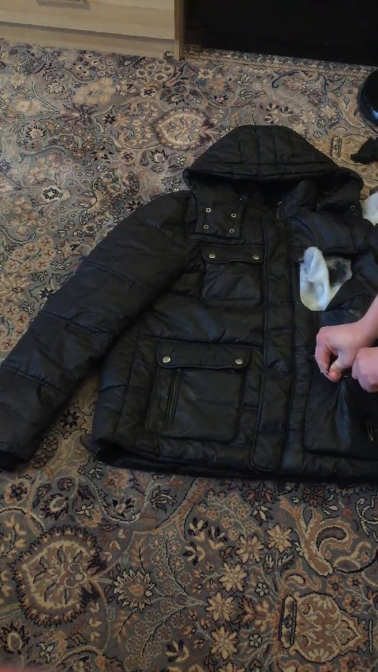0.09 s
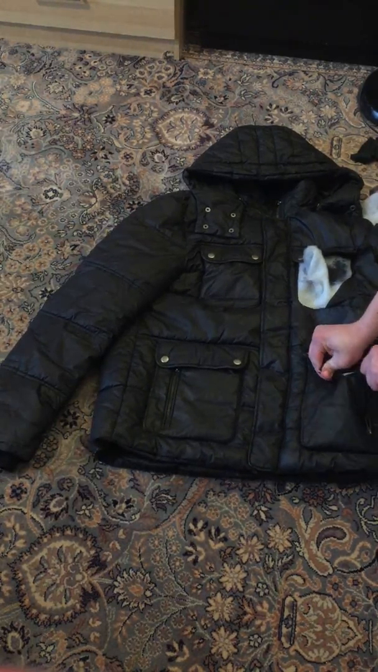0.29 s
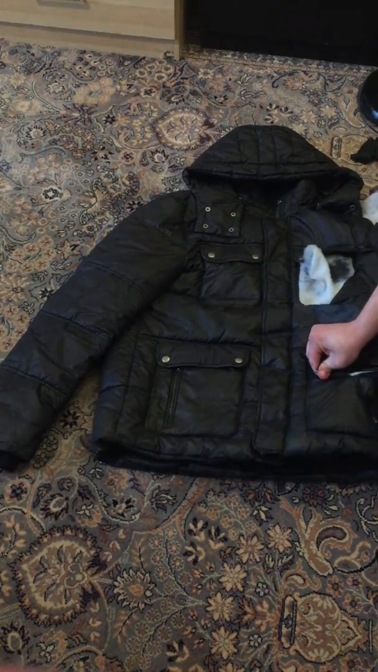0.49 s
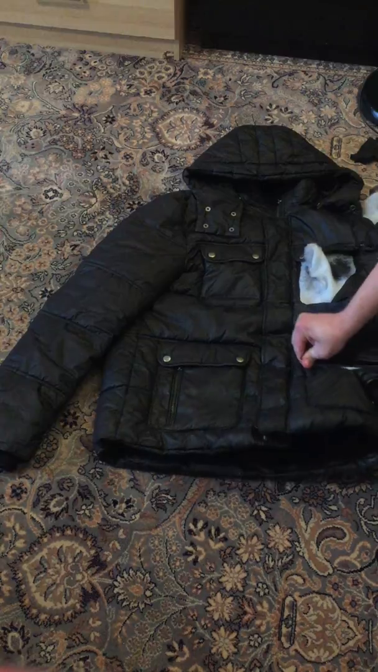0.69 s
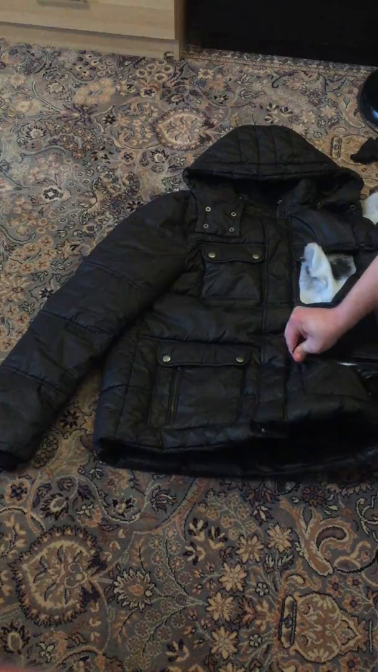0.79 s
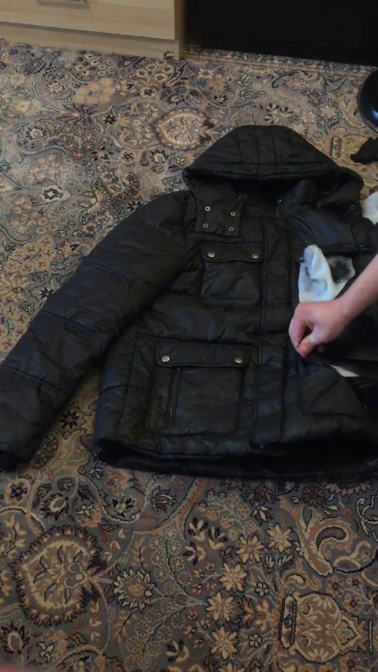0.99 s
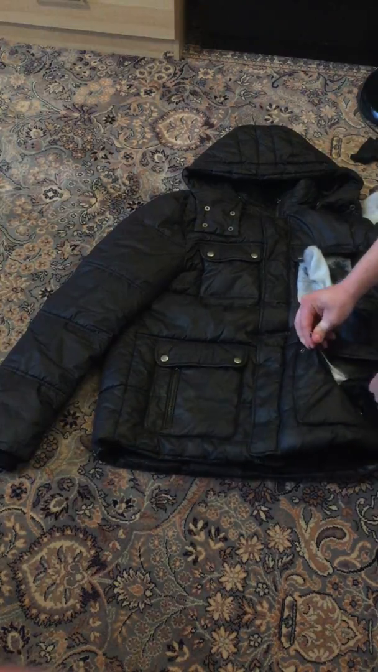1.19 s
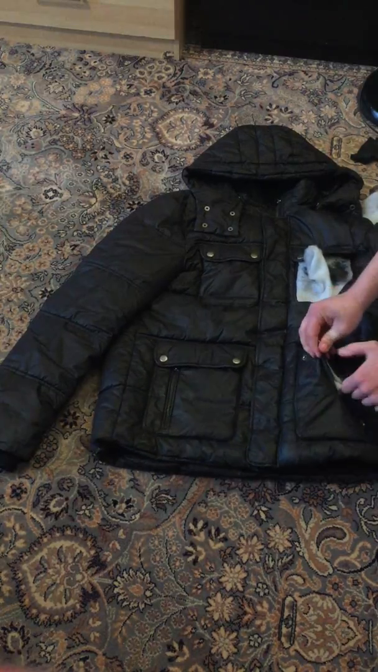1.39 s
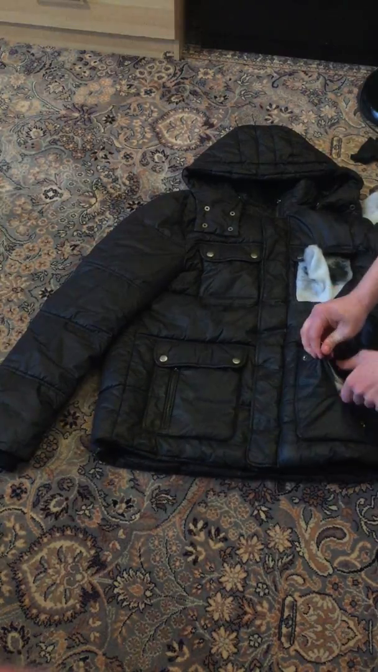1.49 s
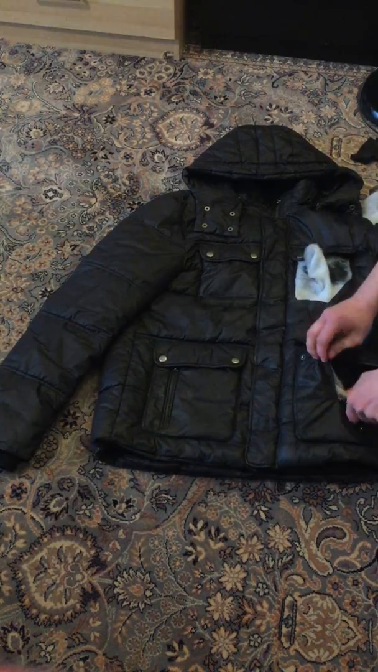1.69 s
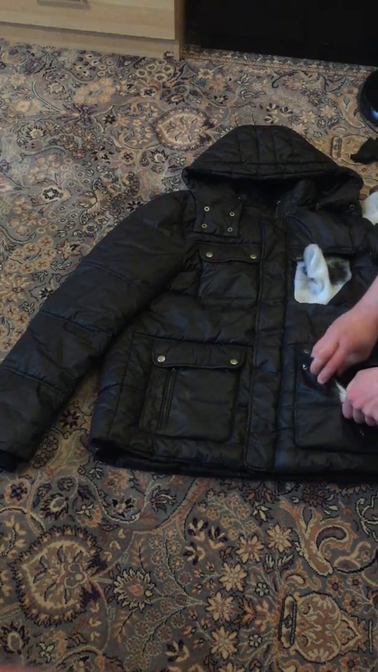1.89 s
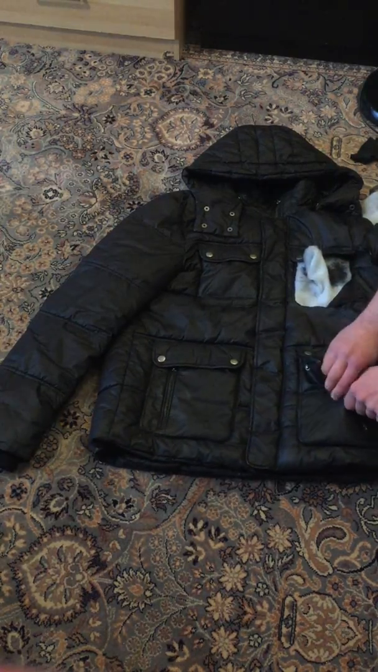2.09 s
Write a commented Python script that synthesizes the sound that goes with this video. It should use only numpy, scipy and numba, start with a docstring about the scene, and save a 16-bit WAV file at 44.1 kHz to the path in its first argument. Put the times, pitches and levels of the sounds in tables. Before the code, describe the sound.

Hands rip open a jacket's glossy synthetic shell in crackling tears, then soft rustling in a quiet room

```python
"""In a small quiet carpeted room, in mono, hands rip open the glossy synthetic shell of a jacket. Single
threads snap as the cloth tightens, then give way in short rips and three long tears: each break is a click with
a brief shiver, ringing in the thread, the taut cloth and the loosened panel, which drums loudest late in the
tearing. After the last threads go, shaped friction grains give a soft rustle under the hands, while faint noise
of the shifting padding runs beneath the whole scene from the start. Steady filtered noise is the air of the
room."""
import sys
import numpy as np
from scipy import signal
from scipy.fft import rfft, irfft
from scipy.io import wavfile
from scipy.ndimage import uniform_filter1d
from numba import njit

SR = 44100
rng = np.random.default_rng(int(sys.argv[2]) if len(sys.argv) > 2 else 0)


def put_to_file(sound):
    """Save the sound as 16-bit audio at rate SR, in the file named by the first command-line argument."""
    columns = np.atleast_2d(sound).T  # one column per channel
    safe = np.clip(columns, -1, 1)
    whole_steps = np.round(safe * 32767)
    wavfile.write(sys.argv[1], SR, whole_steps.astype(np.int16))


N = 92610  # samples, 2.1 s

# how the breaks shake the taut cloth and the loose panel
# [time_s, cloth_drive_db, cloth_ring_hz, panel_drive_db]
SHAKE = [(0, -10, 1900, -23.5), (.14, -14, 1940, -29), (.17, -14, 1630, -18), (.2, -13, 1970, -32),
         (.23, -8.5, 2140, -21.5), (.30, -13.5, 1840, -26), (.38, -4.5, 1700, -20),
         (.44, -6.5, 1670, -22.5), (.51, -14, 1410, -23.5), (.62, -8.5, 1550, -23),
         (.68, -12.5, 1550, -18.5), (.75, -4.5, 1500, -14.5), (.79, -8.5, 1570, -12.5),
         (.83, -11.5, 1550, -15.5), (.90, -15.5, 1620, -16), (.94, -3.5, 1920, -28)]
FRAY_S, FRAY_DB = 0.00055, -3  # decay time of a thread's shiver, its energy against the sharp release


def undb(db):
    """Amplitude factor from dB."""
    return 10 ** (np.asarray(db) / 20)


def unit(x):
    """The signal scaled to an RMS of 1."""
    return x / np.sqrt(np.mean(x ** 2))


def glide(rows, axis=1):
    """Straight lines over time through one column of a table."""
    rows = np.array(rows)
    return np.interp(np.arange(N) / SR, rows[:, 0], rows[:, axis])


def curve(rows, axis=1):
    """Gain over time from a column of dB."""
    return undb(glide(rows, axis))


def ring(x, response):
    """Lets every sample of x set off the response."""
    return signal.fftconvolve(x, response)[:N]


def colour(x, points, size=4096):
    """Causal minimum-phase filter of unit energy through (Hz, dB) points."""
    hz, db = np.array(points).T
    f = np.maximum(np.fft.rfftfreq(size, 1 / SR), 1)
    level_db = np.interp(np.log(f), np.log(hz), db)
    cepstrum = irfft(np.log(undb(level_db)))
    # folding the cepstrum forward puts the energy as early as it can be
    cepstrum[1:size // 2] *= 2
    cepstrum[size // 2 + 1:] = 0
    response = irfft(np.exp(rfft(cepstrum)))
    return ring(x, response / np.linalg.norm(response))


def resonance(x, hz, width_hz):
    """One fixed resonance, gain 1 at its peak."""
    b, a = signal.iirpeak(hz, hz / width_hz, fs=SR)
    return signal.lfilter(b, a, x)


@njit
def gliding(x, hz, width_hz):
    """Band-pass with a moving centre, gain 1 there."""
    y = np.empty(len(x))
    band, low = 0., 0.  # the two states of the filter
    for i in range(len(x)):
        g = np.tan(np.pi * hz[i] / SR)
        damping = np.tan(np.pi * width_hz / SR) * (1 + g * g) / g
        v = (band + g * (x[i] - low)) / (1 + g * (g + damping))
        band = 2 * v - band
        low = low + 2 * g * v
        y[i] = damping * v
    return y


def below(x, hz):
    """Zero-phase low-pass."""
    return signal.sosfiltfilt(signal.butter(2, hz, fs=SR, output="sos"), x)


def clicks(per_s, scatter_db, jitter, size=400):
    """Unevenly spaced clicks of scattered size, with an even power over some ten milliseconds."""
    gap, strength, side = rng.standard_normal((N // 2, 3)).T
    gap = np.exp(jitter * gap)
    at = (np.cumsum(gap / gap.mean()) * SR / per_s).astype(int)
    height = undb(scatter_db * strength) * np.sign(side)
    inside = at < N
    train = np.bincount(at[inside], height[inside], N)
    power = np.abs(uniform_filter1d(train ** 2, size))
    return train / np.sqrt(power + 1e-9)


def crack(fray_s, fray_db, size=512):
    """One break: a sharp release and a brief random shiver of the fibres, unit energy in all."""
    t = np.arange(size) / SR
    fray = rng.standard_normal(size) * np.exp(-t / fray_s) * (t > 0)
    pulse = (t == 0) + undb(fray_db) * fray / np.linalg.norm(fray)
    return pulse / np.linalg.norm(pulse)


def crackle(breaks, fray_s, fray_db, count=12):
    """Gives every break one of a dozen different shivers."""
    kind = rng.integers(0, count, N)
    return sum(ring(breaks * (kind == k), crack(fray_s, fray_db)) for k in range(count))


def surges(per_s=110, depth_db=1.4):
    """The tear catches and lets go many times a second: a random wander in level."""
    hold = int(SR / per_s / 2)  # samples, two steps to a surge
    steps = np.repeat(rng.standard_normal(N // hold + 1), hold)
    walk = uniform_filter1d(steps, hold // 2)[:N]
    swing = unit(walk - uniform_filter1d(walk, 4 * hold))  # without the slow drift
    return unit(undb(depth_db * swing))


def ripping():
    """The tear runs through the weave, thread after thread, in short rips and long pulls."""
    # short rips, a few threads in a row [start_s, length_s, level_db]
    rips = [(0, 0.054, -50.5), (0.225, 0.0075, -30), (0.2647, 0.0055, -28.5), (0.277, .006, -33),
            (0.2867, 0.0079, -30), (0.3088, 0.0016, -27.5), (0.3146, 0.013, -33.5), (.331, 0.0054, -29),
            (0.344, .009, -31), (0.357, .011, -31), (0.388, 0.004, -31), (0.396, 0.018, -37.5),
            (0.411, 0.0098, -34), (0.421, 0.0023, -36), (0.4353, 0.0016, -21.5), (0.437, 0.015, -36),
            (0.545, 0.009, -69), (.5728, 0.0066, -34), (0.6162, 0.011, -33), (0.6515, 0.004, -28),
            (0.7344, 0.01, -35), (0.7717, 0.0023, -25), (0.781, 0.0056, -35)]
    # long tears, one curve each [time_s, level_db]
    tears = [
        [(.453, -32), (.468, -28.5), (.50, -26.5), (.53, -28.5), (.55, -31), (.57, -37.5), (.612, -46)],
        [(.656, -32), (.668, -30.5), (.69, -32), (.71, -30.5), (.725, -38.5), (.75, -38), (.77, -51)],
        [(.778, -35.5), (.80, -29.5), (.83, -29.5), (.855, -31), (.875, -37), (.90, -34), (.915, -34.5),
         (.942, -40)],
    ]
    threads_per_s = 1350
    t = np.arange(N) / SR
    train = clicks(threads_per_s, scatter_db=3.6, jitter=0.55)
    pull = np.zeros(N)
    for rows in tears:
        pull = pull + curve(rows) * (t >= rows[0][0]) * (t < rows[-1][0])
    breaks = train * surges() * pull
    for start, length, db in rips:
        # fades over the half length centred on the end
        gate = np.clip((start + length - t) / (length / 2) + 0.5, 0, 1) * (t >= start)
        burst = train * gate
        burst[np.argmax(gate)] += np.sqrt(SR / threads_per_s)  # the thread that sets it off
        breaks = breaks + undb(db) * burst * np.linalg.norm(gate) / np.linalg.norm(burst)
    return breaks


def snaps():
    """Strong threads part one at a time: the jolts they give the cloth, and their own brief rings."""
    # single strong threads [start_s, level_db, ring_hz]
    strong_threads = [(.0039, -20.5, 6000), (0.0258, -24.5, 6000), (0.0274, -19, 6000), (0.051, -21, 9500),
                      (0.0572, -19.5, 9000), (0.1136, -27, 9500), (0.123, -19.5, 9500), (.1445, -23, 5500),
                      (.17, -13, 5570), (0.2013, -11, 9500), (0.219, -21, 9000), (0.2798, -12.5, 9000),
                      (0.3033, -11, 9000), (0.3125, -10, 8500), (0.3616, -12.5, 9000), (0.6384, -12, 8000),
                      (0.6728, -20, 8000), (0.6968, -11, 10000), (0.8186, -13, 12000),
                      (0.8406, -11.5, 8500), (.864, -9, 7500), (0.8804, -6, 7500), (0.8861, -7.5, 7000),
                      (0.8929, -6, 7500), (.8989, -6, 7000), (0.9081, -5, 5360), (0.9337, -14.5, 5500)]
    ring_db, ring_width_hz = -1, 2700
    jolts, rings = np.zeros(N), np.zeros(N)
    for start, db, hz in strong_threads:
        pulse = crack(FRAY_S, FRAY_DB)
        pulse = pulse + undb(ring_db) * resonance(pulse, hz, ring_width_hz)
        i = max(int(start * SR), 0)
        jolts[i] += undb(db)
        rings[i:i + len(pulse)] += undb(db) * pulse / np.linalg.norm(pulse)
    return jolts, rings


def threads(cracks):
    """The bright crackle of the threads themselves; its ring moves with their tension."""
    # tone of a parting thread [frequency_hz, level_db]
    thread_tone = [(100, -44.5), (500, -32), (900, -28.5), (1500, -14), (2500, -1), (3100, -1.5), (4000, 0),
                   (4700, -2), (5300, -2), (6500, -2), (7500, -3), (9200, -0.5), (10200, -4), (11500, 0.5),
                   (14000, -3.5), (17000, -3)]
    # tension of the threads [time_s, ring_hz, ring_db, top_treble_db]
    tension = [(0, 8800, -4, 7), (.2, 9100, -0.5, 6), (.3, 9300, 0, -4.5), (.46, 7700, 7, 0),
               (.495, 11400, 2, -1), (.525, 4530, -3.5, 0), (.62, 6500, -1, -1.5), (.68, 7860, -12, 1),
               (.75, 11700, -11, 3.5), (.82, 12200, 3.5, -0.5), (.87, 8200, -7, 2), (.92, 4000, -22, -3)]
    ring_width_hz, treble_hz = 4800.0, 12900
    sound = colour(cracks, thread_tone)
    share = curve(tension, axis=2)
    ringing = gliding(sound, glide(tension), ring_width_hz)
    sound = (sound + share * ringing) / np.sqrt(1 + share)
    dull = below(sound, treble_hz)
    return dull + (sound - dull) * curve(tension, axis=3)


def cloth(breaks, order=3):
    """The taut cloth rasps in one broad, steep-sided resonance that glides as the tear goes on."""
    width_hz = 1840.0  # of each pass
    sound = crackle(breaks * curve(SHAKE, axis=1), fray_s=0.001, fray_db=6.5)
    for _ in range(order):
        sound = gliding(sound, glide(SHAKE, axis=2), width_hz)
    return sound * np.sqrt(SR / (width_hz * 3 * np.pi / 8))  # makes up for the narrow band


def panel(breaks):
    """The loose panel drums: the breaks shake it into short shivers of low and middle pitch."""
    # tone of the panel [frequency_hz, level_db]
    panel_tone = [(30, -48), (70, -29), (120, -12), (175, -10.5), (240, 2), (300, 1), (360, 6), (440, -3.5),
                  (620, 0.5), (740, -5.5), (900, -4.5), (1100, -13.5), (1300, -12), (3000, -46)]
    shivers = crackle(breaks * curve(SHAKE, axis=3), fray_s=0.0013, fray_db=2.5)
    return colour(shivers, panel_tone)


def shell(sound):
    """The stretched shell adds narrow resonances to all that sounds in it."""
    # resonances of the stretched shell [centre_hz, width_hz, gain_db]
    shell_modes = [(1370, 20.2, -15), (1550, 17, -14.5), (3030, 77, -3), (5180, 160, 0)]
    return sound + sum(undb(db) * resonance(sound, hz, width_hz) for hz, width_hz, db in shell_modes)


def jacket():
    """Each break sounds from the thread itself, the taut cloth around it and the loose panel."""
    rips = ripping()
    jolts, rings = snaps()
    breaks = rips + jolts
    cracks = crackle(rips, FRAY_S, FRAY_DB) + rings
    return shell(threads(cracks) + cloth(breaks) + panel(breaks))


def rustle():
    """Fine friction grains as the hands slide over the shell, and noise as the padding shifts."""
    # the padding shifting [time_s, level_db]
    padding = [(1, -73), (1.15, -66.5), (1.3, -73), (1.4, -74), (1.56, -75.5), (1.65, -72.5), (1.88, -70.5),
               (2.1, -73.5)]
    # tone of the padding [frequency_hz, level_db]
    padding_tone = [(100, -9), (350, 6), (800, 2), (1600, 0), (2300, 2), (3000, -4), (6000, -16),
                    (16000, -13)]
    # strokes of the hands over the cloth [centre_s, spread_s, level_db, ring_hz]
    strokes = [(1.025, 0.022, -62.5, 11500), (1.129, .028, -66, 12000), (1.193, 0.044, -81, 2000),
               (1.272, .04, -72.5, 2200), (1.485, 0.019, -66.5, 4740), (1.536, 0.022, -71.5, 5000),
               (1.606, 0.013, -70, 9000), (1.652, 0.044, -70.5, 8040), (1.734, 0.039, -69.5, 9000),
               (1.882, 0.067, -71, 2300)]
    # tone of the friction grains [frequency_hz, level_db]
    grain_tone = [(300, -5), (800, -15), (1600, 3), (3000, -2.5), (5000, -4.5), (9000, -7.5), (10300, -9.5),
                  (12000, -3.5), (17000, -10.5)]
    ring_db, ring_q = -3, 2.7
    t = np.arange(N) / SR
    grains = colour(clicks(per_s=5100, scatter_db=3.5, jitter=1.0), grain_tone)
    out = colour(curve(padding) * rng.standard_normal(N), padding_tone)
    for at, spread, db, hz in strokes:
        swish = unit(grains + undb(ring_db) * resonance(grains, hz, hz / ring_q))
        swell = np.exp(-((t - at) / spread) ** 2 / 2)
        out = out + undb(db) * swell * swish
    return out


def room(x):
    """A small carpeted room: a short diffuse tail, weaker and briefer in the treble."""
    tail_db, delay_s, t60_s = -4, 0.003, 0.25
    split_hz, treble_db, treble_t60_s = 8100, -6, 0.16
    t = np.arange(SR // 2) / SR
    noise = rng.standard_normal(len(t)) * (t > delay_s)
    low = below(noise, split_hz)
    fade = np.exp(-np.log(1000) * t / t60_s)
    treble_fade = np.exp(-np.log(1000) * t / treble_t60_s)
    tail = low * fade + undb(treble_db) * (noise - low) * treble_fade
    return x + undb(tail_db) * ring(x, tail / np.linalg.norm(noise * fade))


def air():
    """The quiet of the room: steady noise, strongest in the bass."""
    # tone of the room air [frequency_hz, level_db]
    air_tone = [(20, -49.5), (32, -12.5), (48, 6), (70, 2), (120, 2.5), (180, -4), (350, -9), (700, -14),
                (1800, -18), (4000, -17.5), (9000, -20.5), (10300, -22.5), (12000, -25), (17000, -28.5)]
    level_db = -68.5
    return undb(level_db) * unit(colour(rng.standard_normal(N), air_tone))


def scene():
    """The jacket and the hands sound in the room, over its air."""
    return (room(jacket() + rustle()) + air())[None]


def record(dry):
    """The recorder cuts the deepest bass and the top."""
    bottom_hz, top_hz = 38, 17100
    dry = signal.sosfilt(signal.butter(4, bottom_hz, "high", fs=SR, output="sos"), dry)
    return signal.sosfilt(signal.ellip(8, 0.2, 70, top_hz, fs=SR, output="sos"), dry)


dry = scene()
out = record(dry)
put_to_file(out)
```